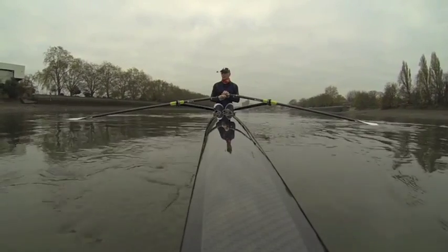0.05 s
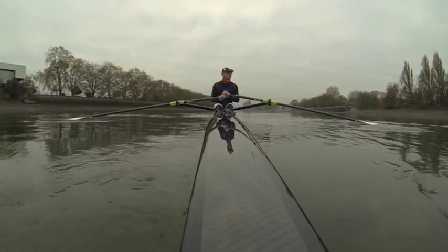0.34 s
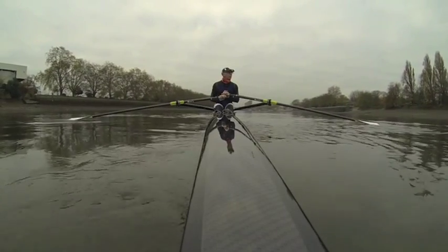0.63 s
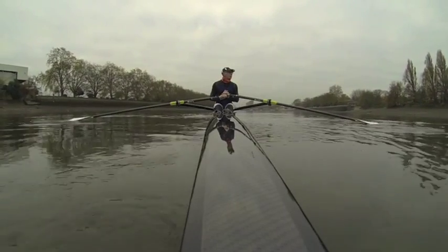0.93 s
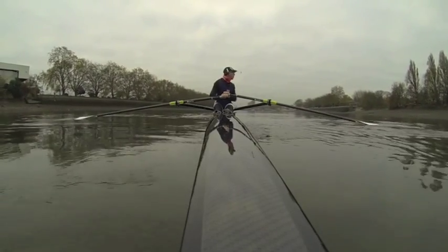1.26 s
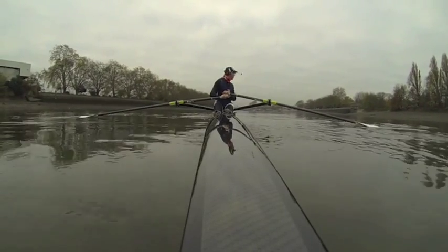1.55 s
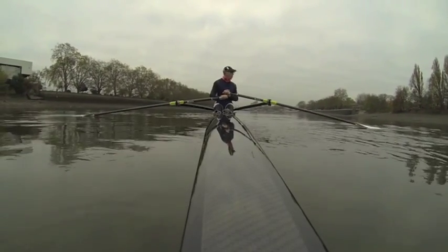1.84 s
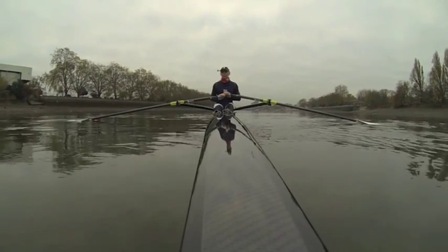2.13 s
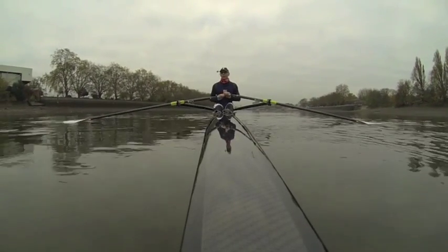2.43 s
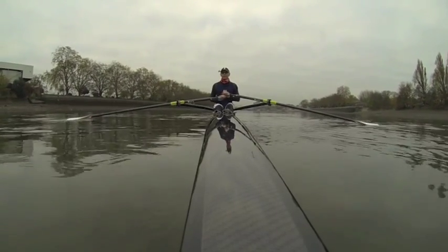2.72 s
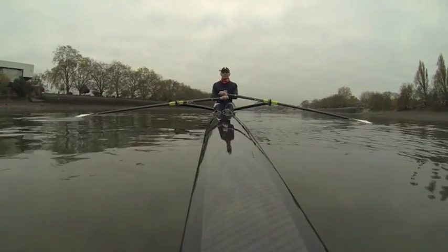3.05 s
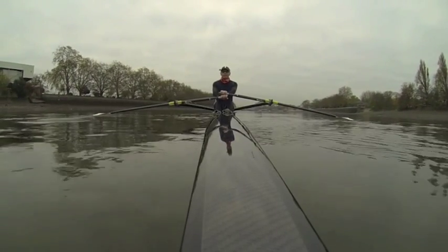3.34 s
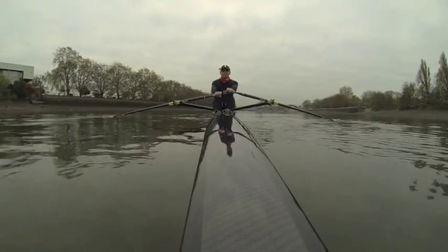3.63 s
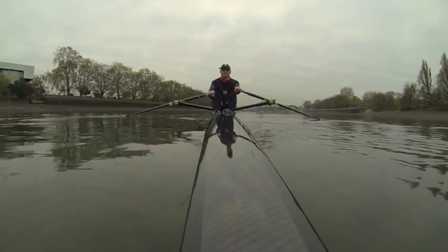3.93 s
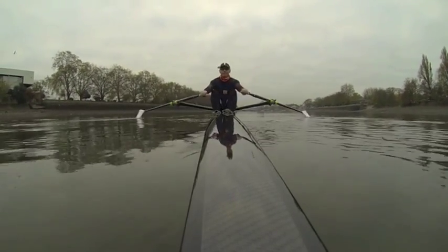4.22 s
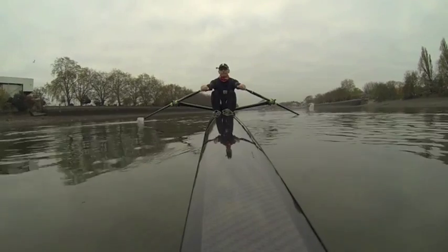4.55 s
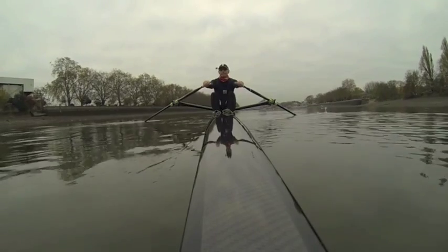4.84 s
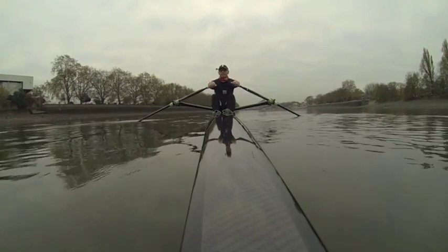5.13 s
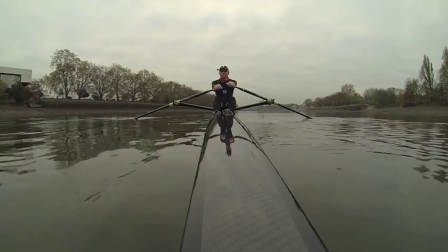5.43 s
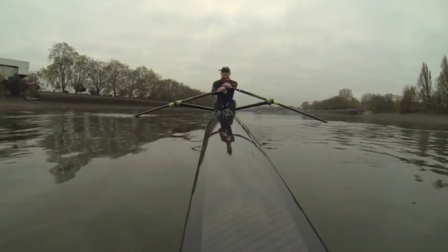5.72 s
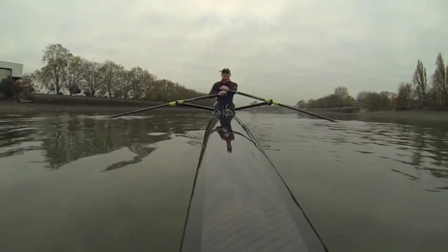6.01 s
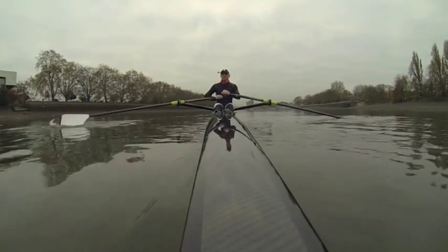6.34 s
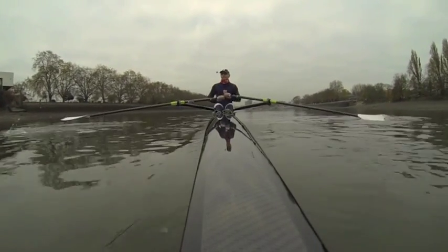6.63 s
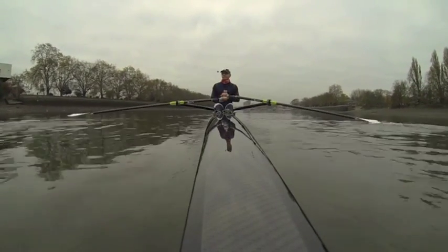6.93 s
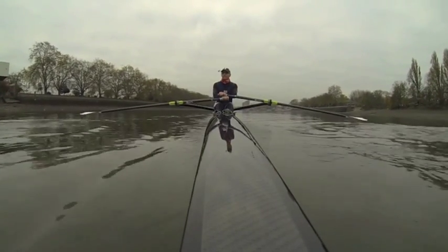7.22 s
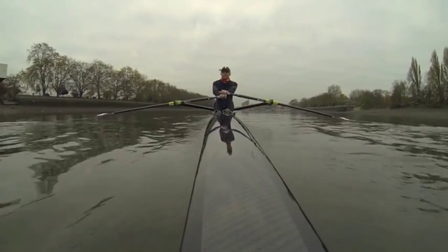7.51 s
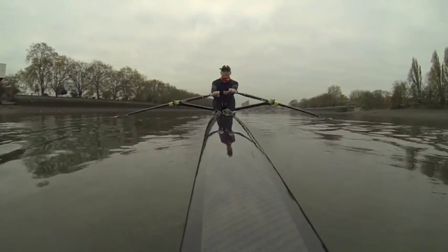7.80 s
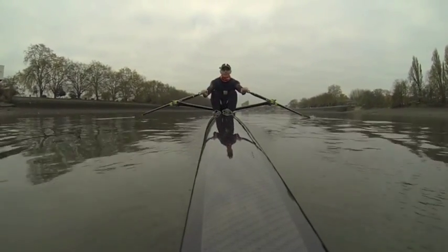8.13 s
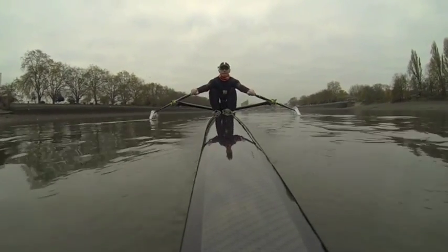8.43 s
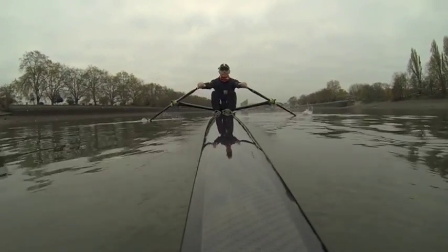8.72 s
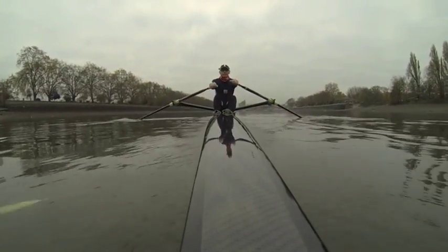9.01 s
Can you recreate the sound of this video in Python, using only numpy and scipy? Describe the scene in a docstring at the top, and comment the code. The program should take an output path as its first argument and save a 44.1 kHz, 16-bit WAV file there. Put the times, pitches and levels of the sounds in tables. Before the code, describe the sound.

Heard close up through the deck of a rowing boat, the hull rumbles softly on quiet river water, broken by a few booming knocks. The seat slides, water swells, and oars clatter as the blades dig in and gurgle. A burst of heavy clunks, sharp snaps and deep booms finishes the stroke. After a short glide a second stroke begins with more rushing water and knocks. A very faint electronic whine lies underneath.

```python
"""A low rumble of water swaying a hull comes first: a single scull on a calm river, the microphone in a
camera fixed to its deck, so nearly all sound arrives through the boat. Oars clunk in their gates at
catch and finish, the seat hits its stops, and every jolt sets the hull booming. Water rushes along the
skin as the boat runs and churns round the blades in the drive. Right at the microphone the camera
whines faintly, and its limiter ducks under the loudest booms."""
import sys
import numpy as np
from scipy import signal
from scipy.fft import rfft, irfft
from scipy.io import wavfile
from scipy.ndimage import uniform_filter1d, minimum_filter1d, map_coordinates

SR = 44100
rng = np.random.default_rng(int(sys.argv[2]) if len(sys.argv) > 2 else 0)


def store_pcm(level_fs):
    """Save levels as 16-bit WAV."""
    pcm = np.round(np.clip(level_fs, -1, 1) * 32767).astype(np.int16)
    wavfile.write(sys.argv[1], SR, np.atleast_2d(pcm).T)


N = 408366
CLOCK = np.arange(N) / SR


def amp(db):
    """Decibels to gain."""
    return 10 ** (np.asarray(db) / 20)


def unit(x):
    """Scaled to rms 1."""
    return x / np.sqrt(np.mean(x ** 2) + 1e-20)


def together(*gains):
    """Level in dB of unrelated sounds heard at once."""
    return 10 * np.log10(sum(g ** 2 for g in gains))


def add(track, s, sound):
    """Mix a sound into the track at s seconds."""
    i = max(0, round(s * SR))
    track[i:i + len(sound)] += sound[:max(0, len(track) - i)]


def wobble(rate):
    """A smooth random curve, rate knots a second."""
    knots = rng.standard_normal(int(N * rate / SR) + 4)
    return map_coordinates(knots, [CLOCK * rate])


def swells(rows, rise_s, fall_s):
    """Gain of events that rise 60 dB in rise_s, hold at their summed levels and fall 60 dB in fall_s."""
    curves = []
    for s, length, *levels_db in rows:
        before, after = np.maximum(s - CLOCK, 0), np.maximum(CLOCK - s - length, 0)
        curves.append(sum(levels_db) - 60 * (before / rise_s + after / fall_s))
    return amp(np.max(curves, axis=0))


def coloured(x, colour):
    """x through a minimum-phase filter that follows the (Hz, dB) points."""
    order = 8192
    hz, db = np.transpose(colour)
    gain = amp(np.interp(np.log(np.fft.rfftfreq(order, 1 / SR) + 1), np.log(hz), db))
    cepstrum = irfft(np.log(gain + 1e-6))
    cepstrum[1:order // 2] *= 2
    cepstrum[order // 2 + 1:] = 0
    return signal.fftconvolve(x, irfft(np.exp(rfft(cepstrum))))[:len(x)]


def noise(colour, size=N):
    """Coloured noise of rms 1."""
    return unit(coloured(rng.standard_normal(size + SR // 4), colour)[-size:])


def bubbles(rate, centre_hz, spread, cycles, scatter_db):
    """A stream of bubbles, rate a second: damped sines that rise in pitch, of rms 1."""
    when, pitch, strength = rng.random((int(rate * N / SR), 3)).T[:, :, None]
    hz = centre_hz * np.exp(spread * (2 * pitch - 1))
    size = amp(-scatter_db * np.log(np.clip(strength, .01, 1)))
    k = np.arange(int(min(SR / 10, 2 * cycles * SR / centre_hz)))
    age = hz * k / SR / cycles  # 1 when a bubble has died by 40 dB
    envelope = size * amp(-40 * age) * (1 - np.exp(-age * cycles * 2))
    grains = envelope * np.sin(2 * np.pi * cycles * age * (1 + .08 * age))
    samples = (when * N).astype(int) + k
    return unit(np.bincount(samples.ravel(), grains.ravel(), N)[:N])


def flow(colour, grains, share, flutter_db):
    """Turbulence and bubbles through the hull, fluttering; share is the bubbles' part of the power."""
    mix = np.sqrt(share) * unit(coloured(grains, colour)) + np.sqrt(1 - share) * noise(colour)
    return mix * amp(flutter_db * wobble(28))


# Rumble of the hull under the microphone. Each row: frequency in Hz, level in dB.
SWAY_COLOUR = [(15, -30), (30, -22.5), (45, -0.5), (56, 2), (64, 9), (71, -5), (82, -8.5), (110, -37),
               (220, -54.5), (600, -110)]
# Its strength, least late in the drive. Each row: time in seconds, level in dB.
SWAY_LEVELS = [(0, -27), (2.5, -29), (5.25, -26), (5.6, -35), (6.1, -25), (9.26, -25)]


def hull_sway():
    """The river keeps the hull swaying, a low unsteady rumble."""
    level = amp(np.interp(CLOCK, *np.transpose(SWAY_LEVELS)))
    return level * noise(SWAY_COLOUR) * amp(1.4 * wobble(6))


# Colours of the water from on deck, low to high. Each row: frequency in Hz, level in dB.
THUD_COLOUR = [(50, -38.5), (90, 9), (160, 0.5), (240, -4.5), (340, -20.5), (550, -32.5), (1400, -100)]
CHURN_COLOUR = [(200, -30.5), (340, -4.5), (435, 1), (490, -5), (560, -1.5), (690, -6.5), (800, -6.5),
                (900, 4.5), (1020, -10.5), (1250, -31), (2200, -76)]
RUSH_COLOUR = [(590, -38.5), (1000, -10.5), (1110, -11), (1200, -0.5), (1500, 1), (1680, -4), (1880, -20),
               (2100, -18.5), (2730, -51), (4620, -120)]
FIZZ_COLOUR = [(1400, -26), (2000, -0.5), (2450, -1), (2700, 6), (2950, 0), (3250, -8.5), (4200, -16),
               (5600, -12.5), (6200, -14.5), (7200, -21.5), (14000, -35.5)]
# Faint wash of the open river, farther off. Each row: frequency in Hz, level in dB.
RIVER_COLOUR = [(150, -12.5), (330, 0), (450, -1), (700, -5), (1100, -10.5), (2000, -30.5)]
# Runs of the seat along its rails. Each row: start of full speed in seconds, length in seconds,
# level in dB, whirr against that level in dB.
SEAT_RUNS = [(0.12, 0.067, -69, -9), (1.716, 0.32, -60.5, -10), (3.531, .62, -47.5, -15.5),
             (7.712, .56, -47, -13.5)]
# Blades working an oar's length away. Each row: start in seconds, length in seconds, level in dB,
# spray against that level in dB.
BLADE_WORK = [(4.42, 0.99, -50, -19.5), (5.76, .15, -51.5, -15), (6.091, 0.28, -40, -18),
              (8.511, 0.11, -44.5, -12), (8.744, 0.64, -44.5, -17)]
# Wash slapping the shell as the boat dips. Each row: start in seconds, length in seconds, level in dB.
HULL_WASHES = [(1.18, 0.04, -40.5), (2.1, 0.074, -43), (3.43, 0.72, -42.5), (4.3, 0.15, -25),
               (6.2, 0.36, -25), (6.78, 0.032, -31), (7.78, 0.067, -35.5), (8.5, 0.11, -26),
               (8.85, 0.48, -38.5)]
SEAT_RAMPS_S, BLADE_RAMPS_S = (1.8, 0.27), (1.0, 0.4)  # rise and fall by 60 dB


def water():
    """Wavelets lap the gliding hull, each slide sets it rushing, and the blades turn the water bubbly."""
    glide = amp(1.5 * wobble(5))
    slide = swells([row[:3] for row in SEAT_RUNS], *SEAT_RAMPS_S)
    rolling = swells(SEAT_RUNS, *SEAT_RAMPS_S)
    blades = swells([row[:3] for row in BLADE_WORK], *BLADE_RAMPS_S) * amp(wobble(10))
    spray = swells(BLADE_WORK, *BLADE_RAMPS_S)
    wash = swells(HULL_WASHES, rise_s=.4, fall_s=1.2)
    slap_db = together(amp(-56.5) * glide, amp(2.5) * slide, amp(-7) * blades, wash)
    churn_db = together(amp(-71) * glide, amp(-4) * slide, amp(-0.5) * blades, amp(-24) * wash)
    rush_db = together(amp(-67) * glide, slide, amp(-0.5) * blades, amp(-25) * wash)
    fizz_db = together(amp(-76) * glide, rolling, spray)
    froth = np.clip((churn_db - fizz_db - 8) / 16, .2, .7)  # bubblier where churn outweighs fizz
    slap = flow(THUD_COLOUR, bubbles(70, 180, .6, 12, 0.86), share=0.5, flutter_db=0.5)
    churn = flow(CHURN_COLOUR, bubbles(160, 680, .5, 24, 3.5), share=froth, flutter_db=1.2)
    rush = flow(RUSH_COLOUR, bubbles(220, 1450, .28, 24, 3.5), share=froth, flutter_db=1.8 * froth)
    fizz = flow(FIZZ_COLOUR, bubbles(160, 2900, .5, 30, 2.5), share=froth * .6, flutter_db=.5)
    river = amp(-67.5) * glide * noise(RIVER_COLOUR)
    return amp(slap_db) * slap + amp(churn_db) * churn + amp(rush_db) * rush + amp(fizz_db) * fizz + river


# Hiss of the electronics behind the microphone. Each row: frequency in Hz, level in dB.
HISS_COLOUR = [(100, 15), (1000, 4), (3000, -1), (5000, -6.5), (9000, -9.5), (13000, -16), (15000, -19)]


def camera():
    """Electronic hiss and a thin whine that switches on once every picture."""
    picture_hz, whine_hz = 47.95, 6430
    cycle = (CLOCK * picture_hz + .04 * wobble(30)) % 1
    gate = uniform_filter1d(1. * (cycle < .45), SR // 1000)
    phase = 2 * np.pi * whine_hz * CLOCK + 1.1 * wobble(70)
    whine = gate * (amp(-66) * np.sin(phase) + amp(-78.5) * np.sin(2 * phase))
    return whine + amp(-63.5) * noise(HISS_COLOUR)


def drips():
    """Stray drips fall all the while, each a tiny ringing bubble."""
    return amp(-80.5) * bubbles(rate=9, centre_hz=2100, spread=.45, cycles=45, scatter_db=3)


# Whirr of the seat wheels, carried along the deck. Each row: frequency in Hz, level in dB.
WHIRR_COLOUR = [(1900, -30), (2500, -9), (2780, 1), (2980, -2.5), (3250, -19.5), (4200, -45.5)]


def seat_wheels():
    """The wheels whirr unevenly on their rails during each run of the seat."""
    return amp(-4 + 2.3 * wobble(16)) * swells(SEAT_RUNS, *SEAT_RAMPS_S) * noise(WHIRR_COLOUR)


# Single gulps of air and drips beside the boat. Each row: start in seconds, level in dB,
# pitch in Hz, time to fade by 60 dB in seconds.
AIR_POCKETS = [(0.135, -56.5, 1370, 0.25), (1.105, -59.5, 2760, 0.1), (1.382, -56.5, 2900, 0.08),
               (5.054, -25, 1360, 0.034), (5.316, -34, 1407, 0.14), (5.71, -47, 420, 0.24),
                       (5.785, -47, 430, 0.26), (5.876, -33.5, 860, 0.047), (5.97, -30, 860, 0.042),
               (6.025, -31.5, 892, 0.055), (9.14, -32, 429, 0.14)]


def gulps():
    """Air pockets ring with a soft start, a wavering shape and a slight rise in pitch."""
    out, t = np.zeros(N), np.arange(SR // 4) / SR
    for s, db, hz, t60 in AIR_POCKETS:
        waver = hz / 2800 * wobble(150)[:len(t)]
        phase = 2 * np.pi * hz * t * (1 + 0.18 * t) + waver
        add(out, s, amp(db + 6 - 60 * t / t60) * (1 - np.exp(-t / 0.0029)) * np.sin(phase))
    return out


# Modes of rigger and shell. Each row: frequency in Hz, level in dB, time to fade by 60 dB in seconds.
RIGGER_MODES = [(410.3, -9.5, 0.27), (527, -7, 0.02), (560, 2, 0.11), (663, -5.5, 0.15), (796, -3.5, 0.031),
                (894, 10.5, 0.066), (938, -1, 0.091), (1020, -5, 0.045), (1227, -1, 0.19),
                (1333, 7.5, 0.055), (1443, 2, 0.15), (1562, 2.5, 0.11), (1576, -7.5, 0.079)]
# Chatter of a landing, heard through the deck. Each row: frequency in Hz, level in dB.
CHATTER_COLOUR = [(150, -45.5), (330, -6), (520, -1.5), (690, -2.5), (900, 3.5), (1080, -4.5), (1350, -4),
                  (1640, -3.5), (1900, -23.5), (2800, -31), (3600, -44.5), (7000, -47.5), (15000, -69.5)]
# Bands of body, knock and clack. Each row: low edge in Hz, high edge in Hz.
BLOW_BANDS = [(380, 700), (740, 1100), (1160, 9000)]
# Oars landing in their gates and the seat hitting its stops, close by. Each row: start in seconds,
# body in dB, knock and clack each against the body in dB, thud in dB, hull boom in dB.
OAR_AND_SEAT_BLOWS = [(0.756, -36.5, -6, 4.5, -16.5, 4.5), (1.137, -45.5, -4, 2, -42, -23.5),
                      (1.656, -51.5, -0.5, -6, -35.5, -11.5), (2.063, -44.5, -7, -12.5, -36, -12),
                      (2.754, -36, 0, -14.5, -15.5, 2.5), (3.417, -47, 0.5, -20.5, -30, -14),
                      (3.647, -52.5, -5, 7, -27, -10), (4.151, -32, 4.5, -1.5, -22, -5),
                      (4.212, -28.5, 5, 1, -12.5, 5), (4.249, -29, 4, -1.5, -25.5, 5),
                      (4.289, -42.5, -4.5, 5, -29.5, 2), (4.514, -52.5, -2, 18, -32.5, -24),
                      (6.111, -22.5, 3.5, -9, -9.5, 9), (6.237, -28, -9.5, 1.5, -29.5, 8),
                      (6.321, -21.5, -20, 5.5, -17, 6.5), (6.416, -21, -4, -7, -26.5, -1.5),
                      (6.464, -28, 4.5, -2.5, -19.5, 3.5), (6.51, -29, 9.5, 7, -18.5, 4.5),
                      (6.729, -29, 0.5, -4, -19.5, 6), (7.743, -51, 3.5, -6.5, -22.5, -7),
                      (8.236, -48, 3, 11.5, -41.5, -14), (8.252, -40, -1, -7, -21.5, 4),
                      (8.297, -38.5, 13, 6, -19.5, 2.5), (8.489, -32.5, 7.5, 1, -20.5, -5),
                      (9.244, -34, 4, 4.5, -25, -3)]
REBOUND_S, REBOUND_DB = .011, -9.5


def knocks():
    """A sleeve or wheel lands, chatters and rebounds; where it strikes sets body, knock and clack."""
    out, t = np.zeros(N), np.arange(SR // 4) / SR
    hz, db, t60 = np.transpose(RIGGER_MODES)[:, :, None]
    bands = [signal.butter(3, edges, "bandpass", fs=SR, output="sos") for edges in BLOW_BANDS]
    dying = amp(-60 * t / .045) + amp(-18 - 60 * t / .16)
    landings = [row[:4] for row in OAR_AND_SEAT_BLOWS]
    rebounds = [(s + REBOUND_S * rng.uniform(.6, 1.4), body_db + REBOUND_DB, *tone)
                for s, body_db, *tone in landings]
    for s, body_db, knock_db, clack_db in landings + rebounds:
        strength = rng.choice([-1, 1], hz.shape) * amp(db + 1.1 * rng.standard_normal(hz.shape))
        detune = 1 + .012 * rng.standard_normal(hz.shape)  # the load on the rigger shifts its modes
        modes = strength * amp(-60 * t / t60) * np.sin(2 * np.pi * hz * detune * t)
        chatter = unit(coloured(rng.standard_normal(len(t)) * dying, CHATTER_COLOUR))
        blow = (unit(modes.sum(axis=0)) + .7 * chatter) * (1 - np.exp(-t / .0012))
        for band, gain in zip(bands, [1, amp(knock_db), amp(clack_db)]):
            part = signal.sosfilt(band, blow)
            add(out, s, amp(body_db) * gain * part / np.std(part[:SR // 50]))  # level of the first 20 ms
    return out


def thuds():
    """Each blow also sends a dull thud through the hull."""
    out, t = np.zeros(N), np.arange(3 * SR // 2) / SR
    envelope = amp(-60 * t / 0.23) * (1 - np.exp(-t / 0.0056))
    for s, *_, thud_db, _ in OAR_AND_SEAT_BLOWS:
        add(out, s, amp(thud_db) * envelope * noise(THUD_COLOUR, size=len(t)))
    return out


# Slow bending of the hull, right under the microphone. Each row: frequency in Hz, level in dB,
# time to fade by 60 dB in seconds.
BENDING_MODES = [(64.47, -0.5, 0.87), (61.12, -11.5, 0.65)]
# Soft lurches as the sculler shifts weight. Each row: start in seconds, boom in dB.
WEIGHT_SHIFTS = [(2.22, -15), (3.977, -9.5), (4.113, -3), (4.629, -11.5), (4.92, -14), (5.277, -22),
                 (8.114, -14), (8.56, -6), (8.734, -4)]
BOOM_RISE_S = 0.012  # the long hull takes about a cycle to swing out


def hull_boom():
    """Each blow or lurch takes over the hull's slow bending. A faint high buzz near 3.9 kHz rises and falls
    with the boom."""
    boom, t = np.zeros(N), np.arange(3 * SR // 2) / SR
    ring = sum(amp(db - 60 * t / t60) * np.sin(2 * np.pi * hz * t) for hz, db, t60 in BENDING_MODES)
    jolts = [(s, boom_db) for s, *_, boom_db in OAR_AND_SEAT_BLOWS]
    for s, boom_db in sorted(jolts + WEIGHT_SHIFTS):
        boom *= 1 - np.clip((CLOCK - s) / BOOM_RISE_S, 0, 1)  # the earlier swing gives way
        add(boom, s, -amp(boom_db) * (1 - np.exp(-t / BOOM_RISE_S)) ** 2 * ring)
    phase = 2 * np.pi * 3900 * CLOCK
    buzz = amp(-66) * np.sin(phase) + amp(-73) * np.sin(2 * phase) + amp(-78) * np.sin(3 * phase)
    return boom * (1 + buzz)


# Sharp, close snaps on the crests of the hardest booms. Each row: start in seconds, peak in dB.
CREST_SNAPS = [(0.774, -22), (2.76, -25), (4.229, -29), (6.13, -18.5), (6.341, -21), (6.532, -19),
               (6.74, -21), (6.789, -29), (8.285, -21)]
# Their colour. Each row: frequency in Hz, level in dB.
SNAP_COLOUR = [(150, 4.5), (350, 8), (750, 1.5), (2000, -7), (3400, -16.5), (6000, -20.5), (10000, -31),
               (15000, -39)]
AFTERSNAP_S, AFTERSNAP_DB = .018, -8


def snaps():
    """A short crack rides each of the hardest booms, and a lighter one follows."""
    out, t = np.zeros(N), np.arange(SR // 4) / SR
    again = [(s + AFTERSNAP_S * rng.uniform(0.32, 1.7), db + AFTERSNAP_DB) for s, db in CREST_SNAPS]
    for s, db in CREST_SNAPS + again:
        crack = coloured(rng.standard_normal(len(t)) * amp(-60 * t / .007), SNAP_COLOUR)
        add(out, s, amp(db) * crack / np.abs(crack).max())
    return out


# Light scrapes of the fittings on board. Each row: start in seconds, level in dB.
FITTING_SCRAPES = [(1.163, -56.5), (1.243, -58), (1.659, -53.5), (3.04, -55), (3.091, -48.5), (3.158, -67),
                   (7.176, -65.5), (8.235, -50.5)]
# Their colour. Each row: frequency in Hz, level in dB.
SCRAPE_COLOUR = [(1200, 5), (2800, 1), (4000, -23), (6300, 2.5), (8000, -21), (14000, -45)]


def scrapes():
    """Loose fittings scrape in brief, bright bursts."""
    out, t = np.zeros(N), np.arange(SR // 4) / SR
    envelope = amp(-60 * t / 0.2) * (1 - np.exp(-t / 0.0013))
    for s, db in FITTING_SCRAPES:
        add(out, s, amp(db) * envelope * noise(SCRAPE_COLOUR, size=len(t)))
    return out


def gurgles():
    """Sparse big bubbles break from the working blades, out to either side."""
    blades = swells([row[:3] for row in BLADE_WORK], *BLADE_RAMPS_S)
    big = unit(coloured(bubbles(22, 640, .6, 40, 2.5), CHURN_COLOUR))
    small = unit(coloured(bubbles(18, 1500, .3, 45, 2.5), RUSH_COLOUR))
    return amp(-7) * blades * (big + amp(-2.5) * small)


def scene():
    """Boat, river and camera meet at one microphone on the deck."""
    gliding = hull_sway() + water() + camera() + drips() + seat_wheels() + gulps()
    strokes = knocks() + thuds() + hull_boom() + snaps() + scrapes() + gurgles()
    return (gliding + strokes)[None]


def limiter(x, ceiling_db, hold_s, release_db_per_s):
    """Gain drops just ahead of a peak, holds, then recovers steadily."""
    need_db = np.minimum(0, ceiling_db - 20 * np.log10(np.abs(x) + 1e-9))
    size, ahead = 2 * int(hold_s * SR / 2) + 1, SR // 300
    held = minimum_filter1d(need_db, size, origin=size // 2, mode="nearest")
    ramp = release_db_per_s * CLOCK
    gain_db = np.minimum.accumulate(held - ramp) + ramp
    return x * amp(uniform_filter1d(minimum_filter1d(gain_db, ahead), ahead))


def record(dry):
    """The camera's limiter ducks under the loudest booms, and the treble is cut above 15.8 kHz."""
    limited = limiter(dry[0], ceiling_db=-1, hold_s=.2, release_db_per_s=25)
    lowpass = signal.ellip(10, .1, 90, 15800, fs=SR, output="sos")
    return signal.sosfilt(lowpass, limited)[None]


dry = scene()
out = record(dry)
store_pcm(out)
```